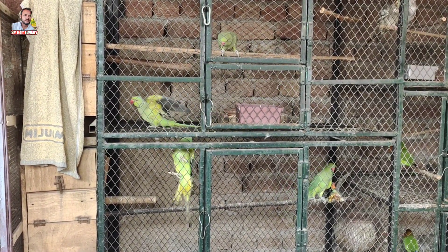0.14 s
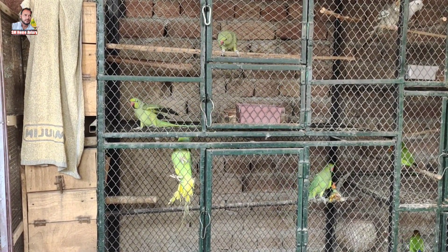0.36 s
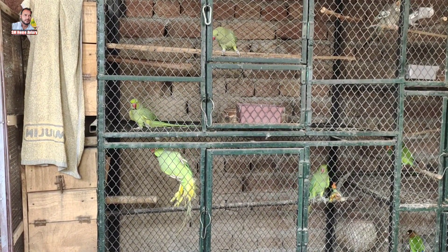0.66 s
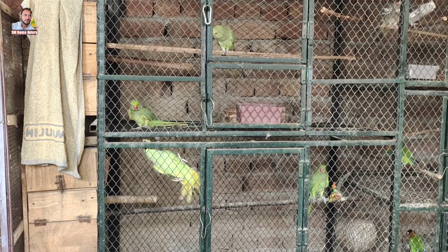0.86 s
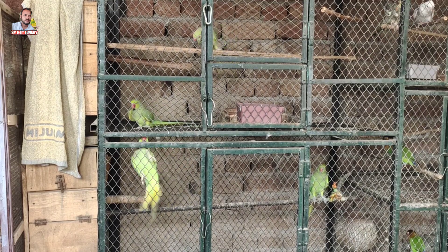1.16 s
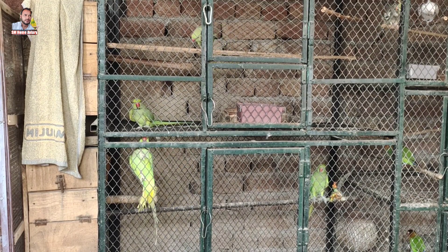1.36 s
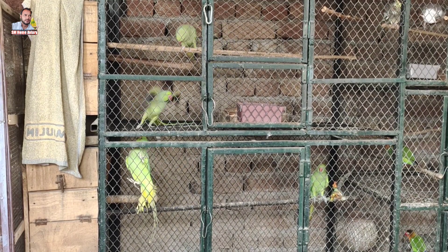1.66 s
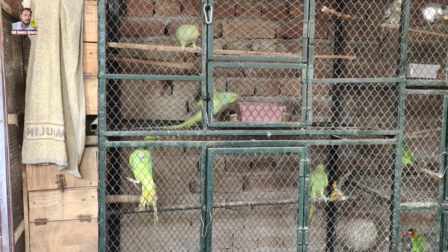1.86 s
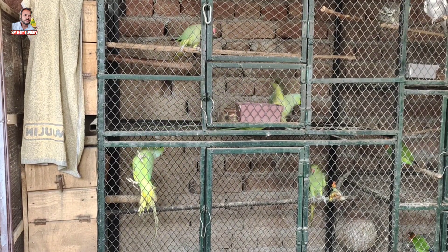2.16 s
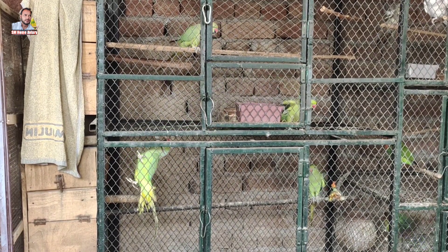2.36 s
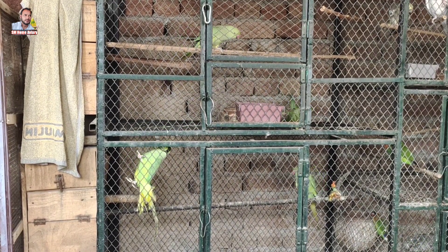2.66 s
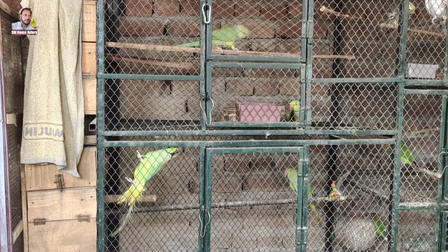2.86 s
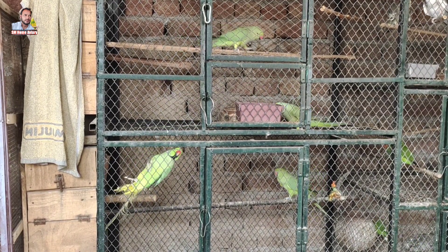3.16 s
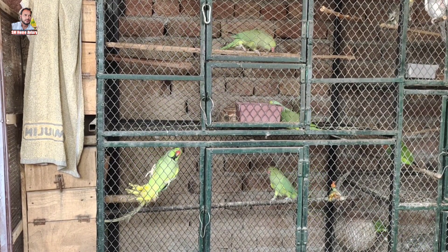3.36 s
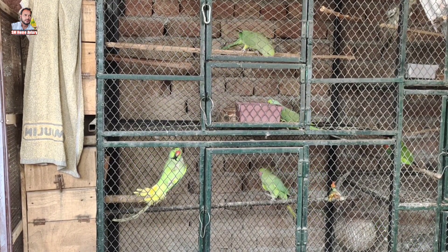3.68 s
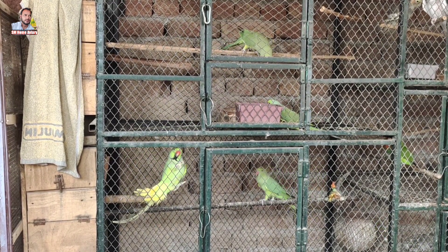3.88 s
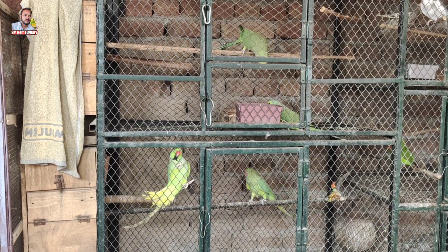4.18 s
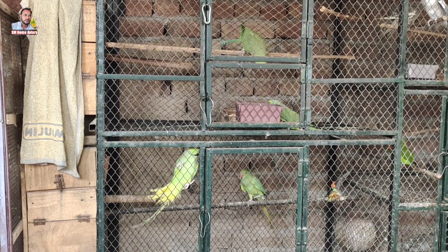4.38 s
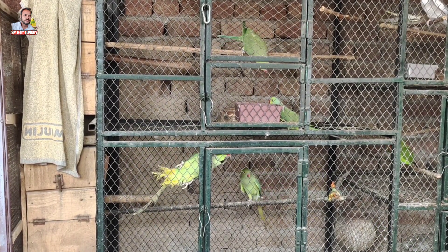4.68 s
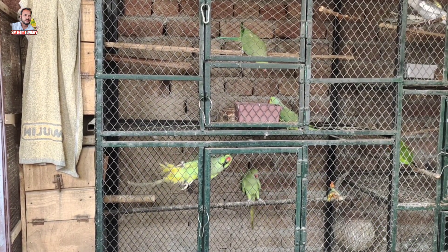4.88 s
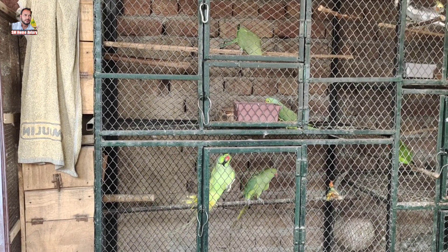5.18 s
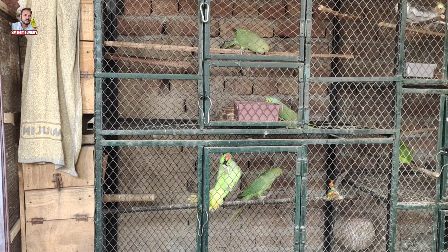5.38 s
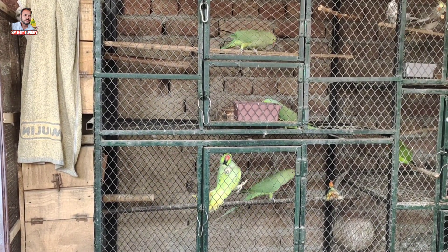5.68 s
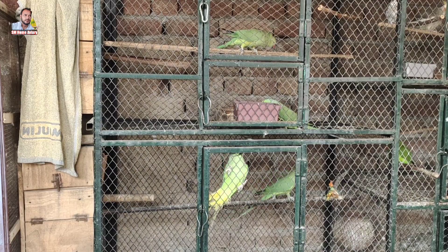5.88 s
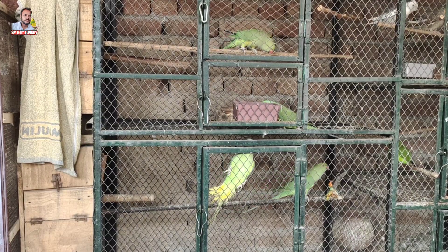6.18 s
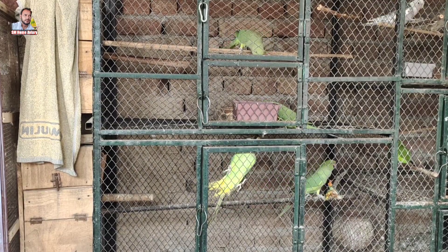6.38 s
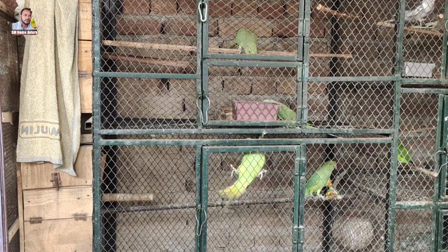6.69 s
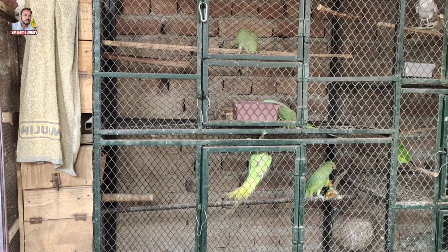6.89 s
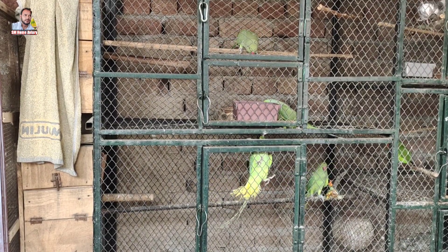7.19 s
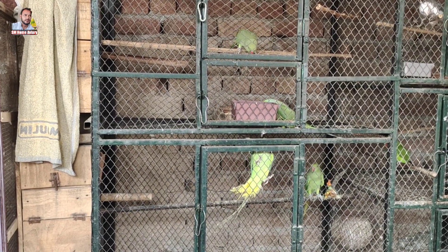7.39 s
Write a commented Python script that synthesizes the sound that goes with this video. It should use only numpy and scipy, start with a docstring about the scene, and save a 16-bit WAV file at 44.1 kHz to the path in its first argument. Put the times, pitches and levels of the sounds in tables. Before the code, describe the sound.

Parakeets squawk, yelp and peep in a small hard-walled aviary, with wing flutters, scrapes on wire mesh and faint pigeon coos behind.

```python
"""Parakeets in a small aviary

Parakeets in wire cages along a brick wall, in a small hard-walled aviary. One squawks: each call sweeps up,
leaps twice between a high and a low register and may break into yelps, warbles and rasping screeches.
Another begs with short arched peeps. Wings beat in flurries of soft thuds and feather noise, feathers and
claws brush the mesh in grainy scrapes, pigeons coo farther off in near-pure tones, and low air stirs."""
import sys
import numpy as np
from scipy import signal
from scipy.fft import rfft, irfft, next_fast_len
from scipy.io import wavfile

SR = 44100
rng = np.random.default_rng(int(sys.argv[2]) if len(sys.argv) > 2 else 0)


def waveform_to_disk(signal):
    """Save audio, clipped to [-1, 1], as 16-bit WAV at the path in sys.argv[1]."""
    frames = np.transpose(np.atleast_2d(signal))
    scaled = np.clip(frames, -1, 1) * 32767
    samples = np.round(scaled).astype(np.int16)
    wavfile.write(sys.argv[1], SR, samples)


N = 332514
TIME = np.arange(N) / SR

# Levels and pans in the tables come before the trims set in each function; a positive pan leans left.
# Spectra give only a shape: the coloured sound is scaled to rms 1.


def amp(db):
    """Turns decibels into an amplitude factor."""
    return 10 ** (np.asarray(db) / 20)


def unit(x):
    """Scales to rms 1."""
    return x / np.sqrt(np.mean(x ** 2) + 1e-20)


def read(points, hz):
    """Reads a table along a log-frequency axis."""
    table_hz, value = np.transpose(points)
    return np.interp(np.log(hz + 1), np.log(table_hz + 1), value)


def colour(x, points):
    """Filters a sound through a spectrum, at rms 1."""
    size = next_fast_len(len(x))
    gain = amp(read(points, np.fft.rfftfreq(size, 1 / SR)))
    return unit(irfft(rfft(x, size) * gain, size)[:len(x)])


def noise(points, size):
    """Random noise with a given spectrum, at rms 1."""
    return colour(rng.standard_normal(size), points)


def wobble(size, hz):
    """Random wavering up to about a given rate, at rms 1."""
    f = np.fft.rfftfreq(size, 1 / SR)
    lowpass = (f > 0) / (1 + (f / hz) ** 4)
    return unit(irfft(rfft(rng.standard_normal(size)) * lowpass, size))


def span(start, end):
    """Progress from 0 to 1, one value a sample, at least 200 samples long."""
    return np.linspace(0, 1, max(round((end - start) * SR), 200))


def fade(size, edge=0.0053):
    """Soft start and stop, each lasting edge seconds."""
    return signal.windows.tukey(size, min(1, 2 * edge * SR / size))


def arch(u, first, middle, last):
    """A parabola through three values."""
    return np.polyval(np.polyfit([0, .5, 1], [first, middle, last], 2), u)


def oscillate(hz):
    """Running phase of a tone that follows a pitch curve."""
    return 2 * np.pi * np.cumsum(hz) / SR


def pan(left_db):
    """Left and right factors for a level difference, at rms 1."""
    return unit(amp([[left_db / 2], [-left_db / 2]]))


def add(mix, s, sound, pan_db=0):
    """Places a sound in time and between left and right."""
    at = round(s * SR)
    sound = sound[max(-at, 0):]
    part = mix[:, max(at, 0):][:, :len(sound)]
    part += pan(pan_db) * sound[:part.shape[1]]


# Level of the low stirring of air. Each row: time in seconds, level in dB.
STIR_LEVEL = [(0.0, -55), (0.02, -53), (0.33, -67), (0.55, -53), (0.86, -78), (0.99, -60.5), (1.24, -54.5),
              (1.6, -64.5), (1.99, -46), (2.2, -54), (2.27, -45), (2.6, -65.5), (2.71, -59.5), (2.92, -68),
              (2.94, -72), (3.38, -58.5), (4.09, -81.5), (4.26, -58.5), (4.39, -73.5), (4.45, -60),
              (5.25, -54.5), (5.27, -52), (5.35, -56), (5.54, -54.5), (5.63, -43.5), (6.49, -70.5),
              (6.57, -63), (7.54, -61.5)]
# Spectrum of the stirring air. Each row: frequency in Hz, level in dB.
STIR_SPECTRUM = [(18, -61), (30, -71), (77, -8.5), (103, -20), (140, 1.5), (296, -2.5), (323, 1.5),
                 (397, -2.5), (556, 2), (826, -12.5), (1000, -13.5), (1300, -21.5), (2200, -120)]
# Spectrum of the steady background noise. Each row: frequency in Hz, level in dB.
FLOOR_SPECTRUM = [(15, -44), (25, -28), (49, 1.5), (169, 3.5), (409, -27), (494, -25), (868, -45),
                  (1200, -9), (3070, -13), (3810, -51.5), (5400, -26), (6880, 2.5), (8300, -11.5),
                  (9490, -18.5), (15400, -13)]


def air(stir_db=-1.5, stir_width=0.32, gust_db=1.5, floor_db=-74, floor_width=0.52):
    """Low, uneven stirring of air, nearly alike in both ears, over a faint steady noise."""
    sides = np.array([[1], [-1]])
    level_db = np.interp(TIME, *np.transpose(STIR_LEVEL)) + stir_db + gust_db * wobble(N, 12)
    stir = noise(STIR_SPECTRUM, N) + stir_width * sides * noise(STIR_SPECTRUM, N)
    floor = noise(FLOOR_SPECTRUM, N) + floor_width * sides * noise(FLOOR_SPECTRUM, N)
    return amp(level_db) * stir + amp(floor_db) * floor


# Distant pigeon coos. Each row: start in seconds, end in seconds, first pitch in Hz, last pitch in Hz,
# level in dB.
PIGEON_COOS = [(0, 0.189, 234.6, 173, -55), (0.009, 0.221, 399, 360.4, -57.5),
               (1.141, 1.286, 343.3, 321.5, -58), (1.273, 1.496, 332.7, 272, -58.5),
               (2.705, 2.927, 261.5, 156, -63), (5.037, 5.233, 560, 548, -57.5),
               (5.38, 5.54, 556, 547.5, -56.5), (7.09, 7.237, 548, 519, -56.5),
               (7.269, 7.452, 405, 397, -58.5)]


def coos(gain_db=0, waver=0.031, bow=1.025):
    """Soft, nearly pure hoots whose pitch follows a shallow, wavering bow."""
    out = np.zeros((2, N))
    for start, end, first, last, db in PIGEON_COOS:
        u = span(start, end)
        middle = bow * (first + last) / 2
        hz = arch(u, first, middle, last) * (1 + waver * wobble(len(u), 40))
        hoot = unit(np.sin(oscillate(hz)))
        add(out, start, amp(db + gain_db) * hoot * fade(len(u), edge=0.026))
    return out


# Level of the feather rustle. Each row: time in seconds, level in dB.
RUSTLE_LEVEL = [(0.0, -58.5), (0.36, -78), (0.46, -58.5), (0.88, -91.5), (1.05, -64), (1.66, -62.5),
                (1.85, -59.5), (2.23, -61), (2.27, -73), (2.48, -63.5), (3.0, -76.5), (3.09, -55.5),
                (3.91, -73.5), (4.37, -72), (4.6, -51.5), (4.66, -70), (5.54, -61), (5.59, -52),
                (5.67, -51), (6.05, -75.5), (6.8, -72), (6.83, -58), (6.93, -65), (7.54, -73)]
# Spectrum of the feather rustle. Each row: frequency in Hz, level in dB.
RUSTLE_SPECTRUM = [(200, -13.5), (650, -1.5), (1200, 3), (2200, 0.5), (4000, -10.5), (7000, -6),
                   (9500, -30), (15000, -27)]


def fanning(gain_db=5, flicker_db=2.5):
    """Spread feathers hiss unevenly as the birds shift and flutter."""
    out = np.zeros((2, N))
    level_db = np.interp(TIME, *np.transpose(RUSTLE_LEVEL)) + flicker_db * wobble(N, 31)
    add(out, 0, amp(level_db + gain_db) * noise(RUSTLE_SPECTRUM, N), pan_db=2.5)
    return out


# Feathers and claws brushing the mesh. Each row: start in seconds, level in dB, fade time constant in seconds.
MESH_BRUSHES = [(1.018, -45, 0.026), (1.11, -43.5, 0.034), (1.209, -40.5, .066), (1.382, -41.5, 0.03),
                (1.417, -36.5, 0.021), (2.253, -43, 0.014), (3.213, -36, 0.029), (3.286, -43, .093),
                (3.356, -32, 0.012), (3.486, -34, 0.029), (3.683, -54, 0.003), (3.809, -57, .05),
                (5.22, -48, 0.012), (5.387, -44, 0.0095)]
# Spectrum of a scrape on the wire. Each row: frequency in Hz, level in dB.
MESH_SPECTRUM = [(400, -23), (1500, -17.5), (3500, -8), (5200, -5.5), (6900, 4.5), (8000, -3.5),
                 (10000, -19.5), (15000, -28.5)]


def brushes(gain_db=-1, grain_db=4, rise_s=0.00082):
    """Feathers and claws catch on the wire in short grainy scrapes."""
    out = np.zeros((2, N))
    t = np.arange(SR // 4) / SR
    for s, db, fade_s in MESH_BRUSHES:
        grain = amp(grain_db * wobble(len(t), 500))
        scrape = colour(rng.standard_normal(len(t)) * grain, MESH_SPECTRUM)
        envelope = (1 - np.exp(-t / rise_s)) * np.exp(-t / fade_s)
        add(out, s, amp(db + gain_db) * scrape * envelope, pan_db=9.0)
    return out


# Flurries of wing beats. Each row: start in seconds, strongest beat in seconds, end in seconds,
# time between beats in seconds, push of air in dB, feather swish in dB.
WING_FLURRIES = [(0, .01, 0.091, .08, -42.5, -38), (1.82, 1.9, 1.915, .03, -42.5, -36.5),
                 (1.905, 2.037, 2.14, .046, -35.5, -43.5), (2.232, 2.27, 2.3, .036, -34.5, -39.5),
                 (2.31, 2.333, 2.5, .06, -45, -46), (2.68, 2.697, 2.635, .05, -42.5, -39.5),
                 (4.79, 4.812, 4.83, .05, -50, -47.5), (5.25, 5.273, 5.27, .05, -32, -67),
                 (5.55, 5.619, 6.02, .053, -45, -45.5)]


def beats(push_taper_db=-8.5, swish_taper_db=-9):
    """Even strokes, weaker toward the ends of a flurry: (seconds, push dB, swish dB)."""
    for start, top, end, period, push_db, swish_db in WING_FLURRIES:
        first, last = int((start - top) / period), int((end - top) / period)
        for k in range(first, last + 1):
            s = top + k * period
            away = np.interp(s, [start, top, end], [1, 0, 1])
            yield s, push_db + push_taper_db * away, swish_db + swish_taper_db * away


# Spectrum of the air shoved by a wing. Each row: frequency in Hz, level in dB.
PUSH_SPECTRUM = [(30, -51), (80, -15), (150, -9.5), (300, 11), (480, 5.5), (750, -18.5), (1500, -18.5),
                 (4000, -33)]
# Spectrum of feathers sliding over each other. Each row: frequency in Hz, level in dB.
SWISH_SPECTRUM = [(300, -12.5), (800, 2), (1600, -2.5), (3000, -5), (5000, -4), (7000, 2), (8500, -12),
                  (10500, -23.5), (15000, -47)]


def wings(push_s=0.0047, swish_s=0.012, push_db=-2, swish_db=-3, grain_db=3):
    """Each stroke shoves air in a soft thud while the feathers slide over each other."""
    out = np.zeros((2, N))
    t = np.arange(-SR // 20, SR // 10) / SR  # 0 is the peak of the stroke
    for s, thud_db, feather_db in beats():
        thud = amp(thud_db + push_db) * noise(PUSH_SPECTRUM, len(t)) / np.cosh(t / push_s)
        grainy_level = amp(feather_db + swish_db + grain_db * wobble(len(t), 450))
        swish = grainy_level * noise(SWISH_SPECTRUM, len(t)) / np.cosh(t / swish_s)
        add(out, s + t[0], thud, pan_db=-0.5)
        add(out, s + t[0], swish, pan_db=9.5)
    return out


# How the throat weighs each harmonic. Each row: frequency in Hz, level in dB.
THROAT_RESPONSE = [(700, -65), (1400, -10.5), (2200, -2.5), (3200, -4), (4500, 0.5), (5500, -10.5),
                   (6700, -1), (7600, -9.5), (9000, -25), (12000, -35), (16000, -89.5)]
# What the open beak lets out. Each row: frequency in Hz, level in dB.
BEAK_RESPONSE = [(600, -32.5), (1100, -17), (1500, -2), (3000, 8.5), (7200, -1), (9000, -5), (15000, -25)]


def syrinx(hz, overtones_db, rough, jitter=0.15, jitter_hz=380, warble=0.157, warble_hz=100,
           shimmer_db=3, rasp=0.23):
    """A membrane tone through throat and beak; roughness shakes its pitch and strength and adds rasp."""
    size = len(hz)
    shake = jitter * wobble(size, jitter_hz) + warble * wobble(size, warble_hz)
    phase = oscillate(hz * (1 + rough * shake))
    partials = []
    for k in range(1, 7):
        below_limit = k * hz < SR / 2
        partials.append(amp(read(THROAT_RESPONSE, k * hz)) * np.sin(k * phase) * below_limit)
    tone = unit(unit(partials[0]) + amp(overtones_db) * unit(sum(partials[1:])))
    tone = tone * (1 + rasp * rough * wobble(size, 1500))  # rasp clings to each harmonic
    shimmer = amp(shimmer_db * rough * wobble(size, 300))
    return colour(tone * shimmer, BEAK_RESPONSE)


def effort(u, swell_db):
    """Air pressure over one note: strongest in the middle, soft at both ends."""
    return unit(amp(swell_db * np.sin(np.pi * u)) * fade(len(u), edge=.004))


# Begging peeps. Each row: start in seconds, end in seconds, top pitch in Hz, level in dB, pan in dB.
BEGGING_PEEPS = [(-0.06, 0.032, 3970, -39, 10), (0.108, 0.201, 3830, -44, 1), (1.063, 1.165, 3825, -43, 5),
                 (1.23, 1.339, 3903, -42, 5), (1.418, 1.504, 3805, -43, 0), (2.678, 2.756, 3756, -44.5, 1),
                 (2.843, 2.948, 3780, -45.5, 5), (3.199, 3.287, 3786, -42, 4),
                 (4.18, 4.278, 3657, -40.5, 21), (4.517, 4.608, 3720, -41, 6),
                 (4.712, 4.779, 3680, -42, 12), (5.414, 5.499, 3620, -41.5, 7),
                 (5.582, 5.677, 3712, -40.5, 4), (5.751, 5.846, 3873, -39, 6),
                 (5.925, 6.009, 3857, -37.5, 9), (7.269, 7.358, 3790, -42.5, 9),
                 (7.441, 7.514, 3704, -42.5, 4)]
# Course of one peep. Each row: share of its length from 0 to 1, pitch as a ratio to the top pitch,
# level in dB.
PEEP_COURSE = [(0, .84, -6.5), (.12, .915, 5.5), (.4, 1, -0.5), (.68, 1, 3), (.86, 0.97, 2), (.94, .85, 5),
               (1, 0.3, 1.5)]


def peeps(gain_db=-3):
    """A thin whistle climbs, holds and drops away."""
    out = np.zeros((2, N))
    share, bend, swell_db = np.transpose(PEEP_COURSE)
    for start, end, hz, db, pan_db in BEGGING_PEEPS:
        u = span(start, end)
        whistle = syrinx(hz * np.interp(u, share, bend), overtones_db=-6, rough=0.11)
        level = amp(db + gain_db + np.interp(u, share, swell_db))
        add(out, start, level * whistle * fade(len(u)), pan_db)
    return out


# Warbled calls, one curve of rows each. Each row: time in seconds, pitch in Hz, level in dB,
# roughness from 0 to 1.
WARBLE_CURVES = [
    [(.408, 3195, -32, 0.25), (.42, 3760, -26.5, .2), (.44, 2850, -37, .2), (.456, 3740, -24.5, .2),
     (.468, 3070, -28.5, 0.28), (.478, 2280, -25.5, 0.21), (.499, 2010, -31, 0.2)],
    [(1.508, 3365, -33, 0.25), (1.53, 2866, -33.5, 0.14), (1.542, 3036, -37, 0.21),
     (1.552, 2400, -26.5, 0.1), (1.577, 2120, -28.5, 0.23), (1.6, 3140, -32, 0.18),
     (1.607, 2300, -27, 0.14), (1.62, 2480, -28, 0.2)],
    [(2.041, 3480, -53, .4), (2.07, 2800, -46, 0.38), (2.108, 2029, -37, 0.38)],
    [(2.446, 4100, -51.5, 0.2), (2.48, 2198, -38.5, 0.17), (2.505, 2350, -42, 0), (2.511, 2866, -31.5, 0.6),
     (2.524, 2540, -28.5, 0.18), (2.545, 2490, -26, 0.02), (2.558, 2170, -31.5, 0.15)],
    [(4.351, 2920, -25, 0.38), (4.358, 3637, -26, .27), (4.39, 3600, -39, .4), (4.397, 2714, -29, 0.17),
     (4.415, 2824, -32, 0.28), (4.421, 2393, -22.5, 0.3), (4.434, 2796, -23.5, 0.31),
     (4.452, 2190, -31.5, 0.18), (4.47, 3650, -31.5, 0.36), (4.483, 2580, -24, 0.32),
     (4.507, 1386, -37, 0.35)],
    [(5.208, 2548, -48, 0.1), (5.275, 2355, -44, 0.11), (5.285, 2840, -42.5, 0.02), (5.321, 2925, -43, .04)],
]


def warbles(gain_db=-3, overtones_db=-15, left_db=14):
    """One unbroken rough tone whose pitch swings up and down."""
    out = np.zeros((2, N))
    for curve in WARBLE_CURVES:
        s, *controls = np.transpose(curve)
        t = np.arange(s[0], s[-1], 1 / SR)
        hz, db, rough = (np.interp(t, s, control) for control in controls)
        voice = syrinx(hz, overtones_db, np.clip(rough, 0, 1))
        add(out, s[0], amp(db + gain_db) * voice * fade(len(t), edge=.003), left_db)
    return out


# Short arched yelps. Each row: start in seconds, end in seconds, middle pitch in Hz, rise over the note
# as a share of that pitch, level in dB, overtones in dB, roughness from 0 to 1, pan in dB.
YELP_NOTES = [(0.385, 0.4, 3470, -0.49, -31, -11, 0.38, 7),
              (0.485, 0.502, 3970, -0.23, -28.5, -8, 0.44, 12.5),
              (1.465, 1.511, 2123, -0.034, -35.5, -4.5, 0.4, 6),
              (2.499, 2.531, 3615, .05, -36, 4.5, 0.38, 12), (2.61, 2.642, 3445, 0.08, -27.5, 9.5, 0.2, 7),
              (2.689, 2.726, 1995, -.05, -39, -5, 0.33, 3.5),
              (4.353, 4.394, 2074, -0.032, -35, 1.5, 0.41, 4), (6.62, 6.632, 3510, -.05, -26, -5, 0.41, 9),
              (6.653, 6.683, 3460, 0.03, -28, -5, .2, 19), (6.693, 6.706, 3640, -.03, -24.5, 0, .15, 10),
              (6.707, 6.725, 2900, 0.17, -24, 2, .28, 12), (6.72, 6.739, 1958, -0.16, -27.5, 8.5, 0.04, 10),
              (6.74, 6.784, 2584, -0.11, -24.5, -3, 0.24, 10),
              (6.789, 6.813, 3230, -0.327, -23, -10, 0.39, 13)]


def yelps(gain_db=-3, swell_db=4, left_db=2, droop=.93):
    """Quick notes whose pitch bends in an arch tilted up or down; droop is the mean of its two ends."""
    out = np.zeros((2, N))
    for start, end, hz, rise, db, overtones_db, rough, pan_db in YELP_NOTES:
        u = span(start, end)
        bend = arch(u, droop - rise / 2, 0.99, droop + rise / 2)
        note = syrinx(hz * bend, overtones_db, np.clip(rough, 0, 1))
        add(out, start, amp(db + gain_db) * note * effort(u, swell_db), pan_db + left_db)
    return out


# Harsh screeches. Each row: start in seconds, end in seconds, first pitch in Hz, last pitch in Hz,
# level in dB, treble against the lows in dB, chaos (0 for none, about 1 for the wildest), pan in dB.
HARSH_SCREECHES = [(4.744, 4.764, 2190, 2650, -30.5, -2.5, 0.61, 7),
                   (4.757, 4.77, 2234, 2127, -25, 10, 0.74, 11),
                   (4.854, 4.907, 2022, 2216, -23.5, 5, 0.73, 9),
                   (4.899, 4.954, 2180, 2487, -26, -4.5, 0.54, 3),
                   (4.945, 5.004, 2413, 1858, -24.5, -12, 0.6, 11),
                   (6.844, 6.876, 2624, 2410, -23.5, -3, 0.8, 10),
                   (6.937, 6.959, 2200, 2410, -21.5, 4.5, 0.98, 6),
                   (6.955, 6.991, 2360, 2192, -23, 2.5, 1.06, 8),
                   (7.015, 7.066, 1968, 1817, -28.5, 3, .6, 7),
                   (7.061, 7.092, 2488, 2187, -23.5, 1.5, 0.85, 7),
                   (7.1, 7.145, 1776, 2092, -29.5, -8, 0.67, 8),
                   (7.222, 7.235, 2894, 4260, -22.5, -9.5, 0.62, 7.5),
                   (7.233, 7.259, 3160, 2604, -23, 7.5, 0.94, 19)]
# Spectrum of the screech. Each row: frequency in Hz, level in dB.
RASP_SPECTRUM = [(600, -49), (1400, -12.5), (2100, -4), (3000, 8), (4400, 2.5), (5400, -2.5), (6800, -5),
                 (7700, -13), (9000, -24), (11000, -46.5), (16000, -46)]


def screeches(gain_db=-3, jitter=0.1405, hiss=1.0, crackle_db=6.0, split_hz=5200, swell_db=6,
              flutter_hz=140, flutter_db=2.5):
    """Overdriven, the membranes flap unevenly and the gliding harmonics smear into rasp."""
    out = np.zeros((2, N))
    lowpass = signal.butter(4, split_hz, fs=SR, output="sos")
    for start, end, first, last, db, treble_db, chaos, pan_db in HARSH_SCREECHES:
        u = span(start, end)
        size = len(u)
        phase = oscillate((first + (last - first) * u) * (1 + jitter * chaos * wobble(size, 686)))
        harmonics = unit(sum(np.sin(k * phase) for k in range(1, 4)))
        drive = harmonics + hiss * chaos ** 2 * rng.standard_normal(size)
        # slow, uneven pulsing
        flutter = np.sin(oscillate(flutter_hz * (1 + 0.46 * wobble(size, 92))))
        shake_db = chaos * (crackle_db * wobble(size, 560) + flutter_db * flutter)
        voice = colour(drive * amp(shake_db), RASP_SPECTRUM)
        low = signal.sosfiltfilt(lowpass, voice)
        cry = unit(unit(low) + amp(treble_db) * unit(voice - low))
        add(out, start, amp(db + gain_db) * cry * effort(u, swell_db), pan_db)
    return out


# Long squawks. Each row: start in seconds, lengths of the sweep and of the four notes in seconds,
# first pitch of the sweep in Hz, bend of the sweep (1 is straight, more rises later), high register in Hz,
# low register in Hz, sweep level in dB, note level in dB, extra overtones in dB, roughness from 0 to 1,
# pan in dB.
LONG_SQUAWKS = [(0.137, (.095, .051, 0.053, .054, .021),
                1406, 1.63, 3294, 2303, -29, -25.5, 0.15, .16, 6.8), (0.677, (0.081, 0.05, .044, .06, .028),
                1474, 1.33, 3246, 2415, -28, -23, -2, .1, 4.4), (2.903, (0.093, 0.041, .053, 0.071, .029),
                1486, 2.77, 3064, 2228, -30, -26, 1, .18, 3), (3.889, (.078, .055, 0.057, 0.053, 0.028),
                1435, 1.2, 3166, 2316, -26, -24.5, -1, 0.145, 5.2), (6.37, (.093, .043, .057, 0.061, .028),
                1379, 1.81, 3016, 2045, -29.5, -26, 0.33, 0.19, 4.6)]
# The four notes after the sweep: high, low, high, low. Each row: first pitch and last pitch as ratios
# to the register, level in dB, overtones in dB, roughness as a ratio to the call's, pan in dB.
REGISTER_LEAPS = [(.88, .96, 1, -9, 0.74, 0), (1.2, 1.07, 0, -9, 1.4, -2.3),
                  (.93, .92, 0, -10.5, 0.93, 2.6), (1.3, 0.88, -4, -4.5, 2.2, 0.43)]


def squawks(gain_db=-3, swell_db=3.5, crescendo_db=10, sweep_to_hz=2326, sweep_overtones_db=0,
            sweep_rough=.12, sweep_edge_s=.007, overlap_s=.003, sweep_pan_db=-2, left_db=0.5):
    """Each call slides up, growing louder, then leaps between a high and a low register."""
    out = np.zeros((2, N))
    for (start, lengths, first_hz, bend, high_hz, low_hz, sweep_db, db, bright_db, rough,
         pan_db) in LONG_SQUAWKS:
        edges = start + np.cumsum(lengths)
        u = span(start, edges[0] + overlap_s)
        sweep_hz = first_hz + (sweep_to_hz - first_hz) * u ** abs(bend)
        sweep = syrinx(sweep_hz, sweep_overtones_db, sweep_rough)
        pressure = unit(amp(crescendo_db * np.sin(np.pi * u / 2)) * fade(len(u), sweep_edge_s))
        add(out, start, amp(sweep_db + gain_db) * sweep * pressure, pan_db + left_db + sweep_pan_db)
        for begin, stop, hz, leap in zip(edges, edges[1:], [high_hz, low_hz] * 2, REGISTER_LEAPS):
            first, last, note_db, overtones_db, harsh, turn_db = leap
            u = span(begin - overlap_s, stop + overlap_s)
            note_hz = hz * arch(u, first, 0.99, last)
            note = syrinx(note_hz, overtones_db + bright_db, np.clip(rough * harsh, 0, 1))
            note = amp(db + gain_db + note_db) * note * effort(u, swell_db)
            add(out, begin - overlap_s, note, pan_db + left_db + turn_db)
    return out


# Ring of the aviary. Each row: frequency in Hz, time to decay by 60 dB in seconds.
ROOM_RING = [(150, 0.34), (600, 0.17), (2500, 0.3), (7000, 0.31), (14000, 0.37)]


def echoes(early=0.55, early_s=0.011, left_db=5.0, shared_hz=330):
    """Strong early echoes off the brick and a short tail; the bass is common to both ears."""
    size, step = SR // 2, SR // 2000
    at = np.arange(step * 4, size - step, step)
    at = at + rng.integers(0, step, (2, len(at)))  # one randomly placed echo a step, per ear
    taps = np.zeros((2, size))
    np.put_along_axis(taps, at, rng.choice([-1., 1.], at.shape), 1)
    hz, t, z = signal.stft(taps, SR, nperseg=256)
    same = (1 / (1 + (hz / shared_hz) ** 4))[:, None]
    z = np.array([z[0], same * z[0] + np.sqrt(1 - same ** 2) * z[1]])
    decay = np.exp(-np.log(1000) * t / read(ROOM_RING, hz)[:, None])
    decay = decay * (1 + early * np.exp(-t / early_s))
    tail = signal.istft(z * decay, SR)[1]
    return tail / np.linalg.norm(tail[0]) * pan(left_db)


def aviary(x, wet_db, drift_ms=0.25, count=4):
    """Direct sound plus echoes; its direction and their pattern keep changing as the birds turn and climb."""
    wet = np.zeros((2, N))
    for k in range(count):
        # each echo pattern fades in and out 1.3 times a second, in turn
        share = np.maximum(np.cos(2 * np.pi * (1.3 * TIME + k / count)), 0)
        wet += signal.oaconvolve((share * x.mean(0))[None], echoes(), axes=1)[:, :N]
    lag = drift_ms / 1000 * wobble(N, 1.5)  # wandering delay of the right ear
    direct = np.array([x[0], np.interp(TIME - lag, TIME, x[1])])
    return (direct + amp(wet_db) * wet) / np.hypot(1, amp(wet_db))


def scene():
    """Air, then pigeons and feathers, begging and squawking, each group with its own echoes."""
    others = aviary(wings() + brushes() + fanning() + coos(), wet_db=3.0, drift_ms=0.096)
    begging = aviary(peeps(), wet_db=0)
    calls = aviary(squawks() + yelps() + warbles() + screeches(), wet_db=2.0)
    return air() + others + begging + calls


def record(dry, low_cut_hz=62, edge_hz=15350):
    """The microphone's low cut and the recorder's band limit."""
    thin = signal.sosfilt(signal.butter(2, low_cut_hz, "high", fs=SR, output="sos"), dry)
    band_limit = signal.firwin(511, edge_hz, window=("kaiser", 9), fs=SR)
    return signal.oaconvolve(thin, band_limit[None], "same")


dry = scene()
out = record(dry)
waveform_to_disk(out)
```